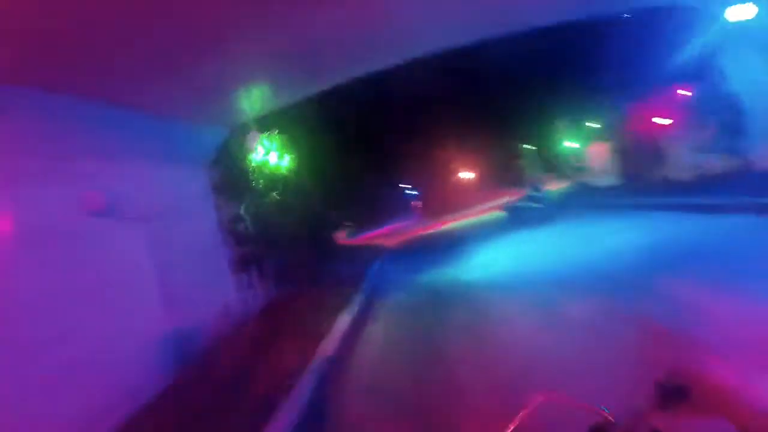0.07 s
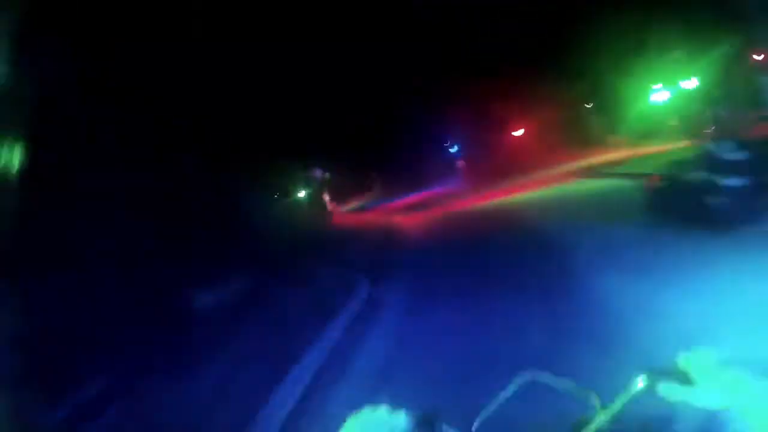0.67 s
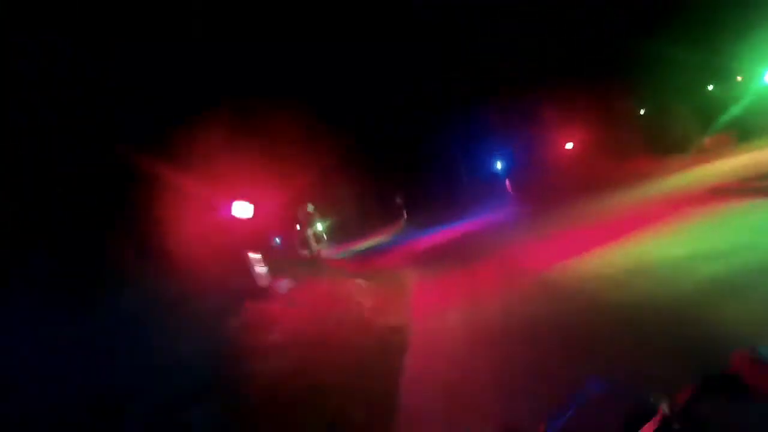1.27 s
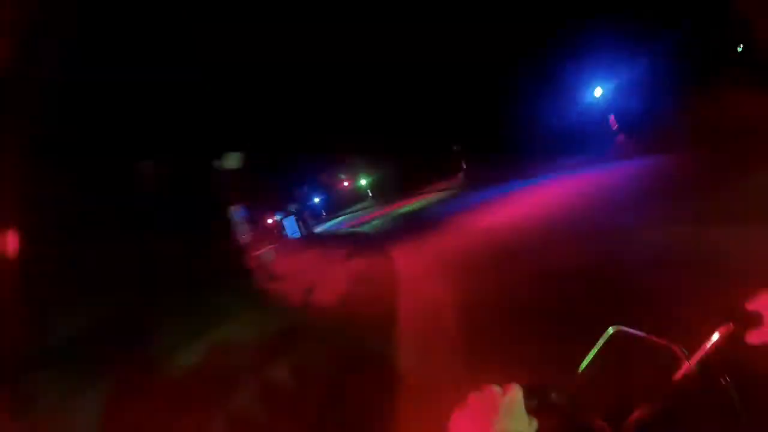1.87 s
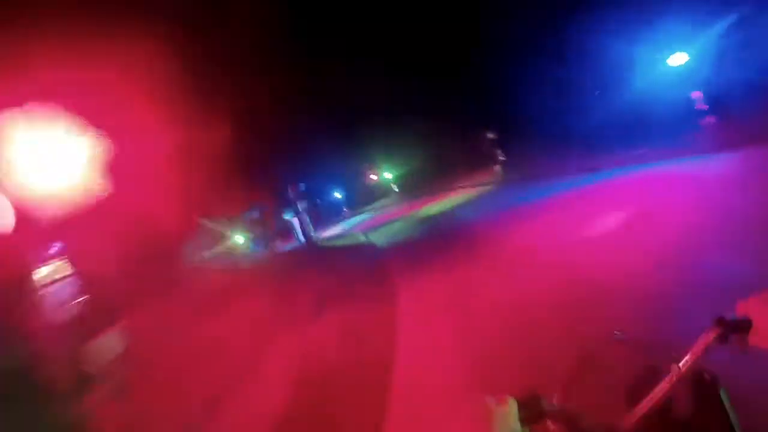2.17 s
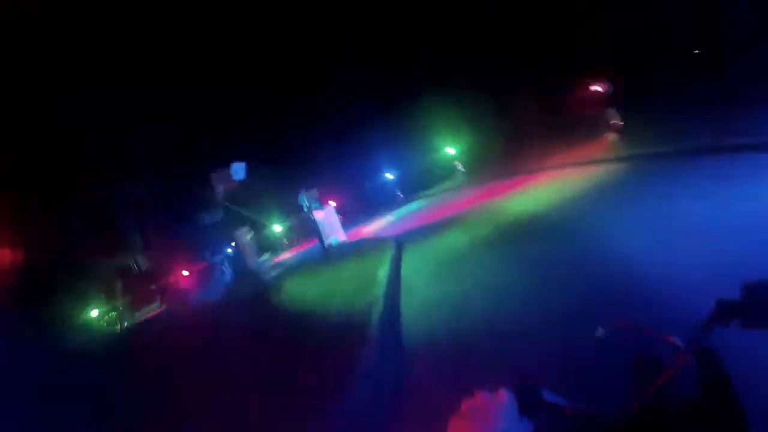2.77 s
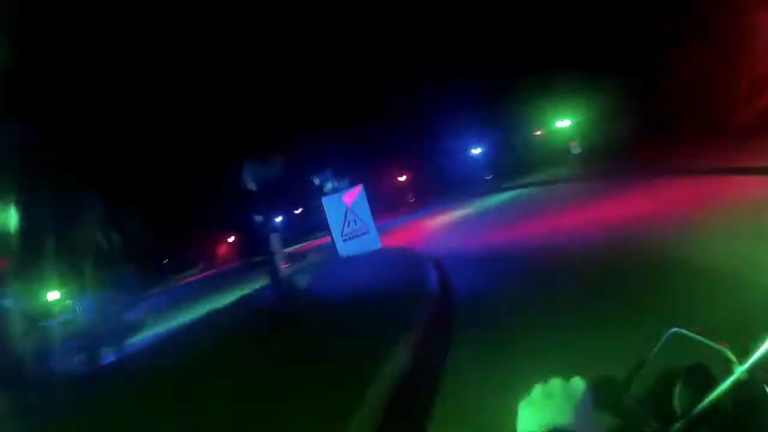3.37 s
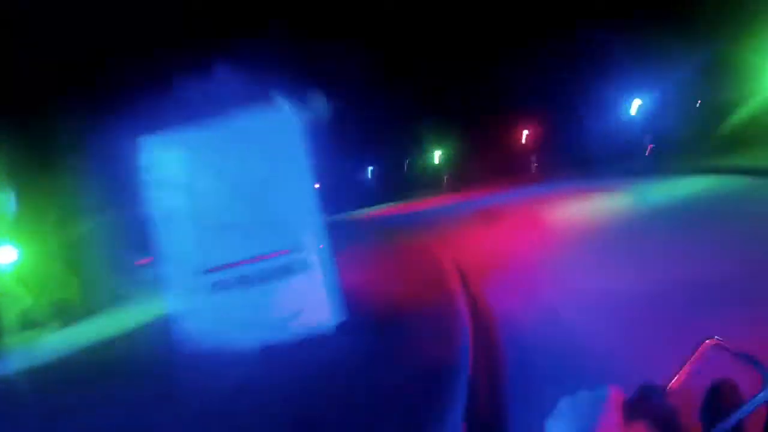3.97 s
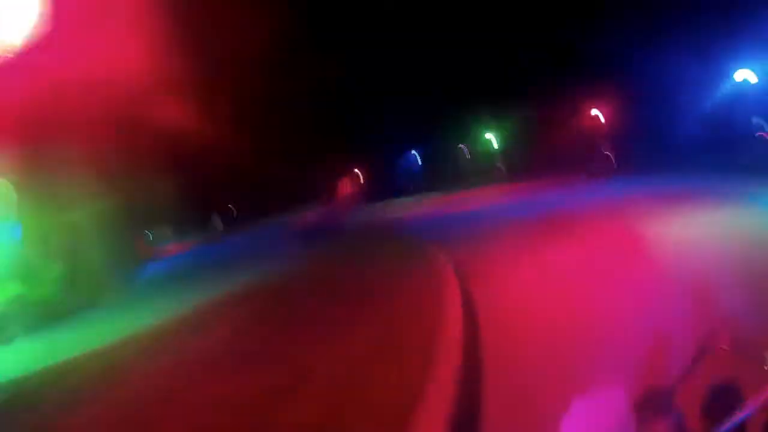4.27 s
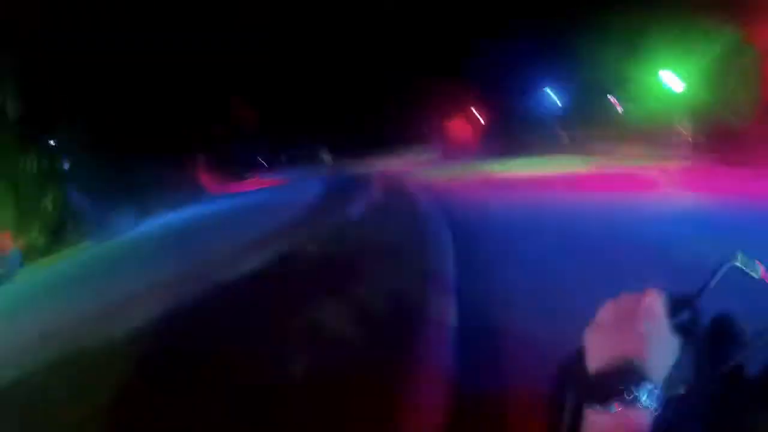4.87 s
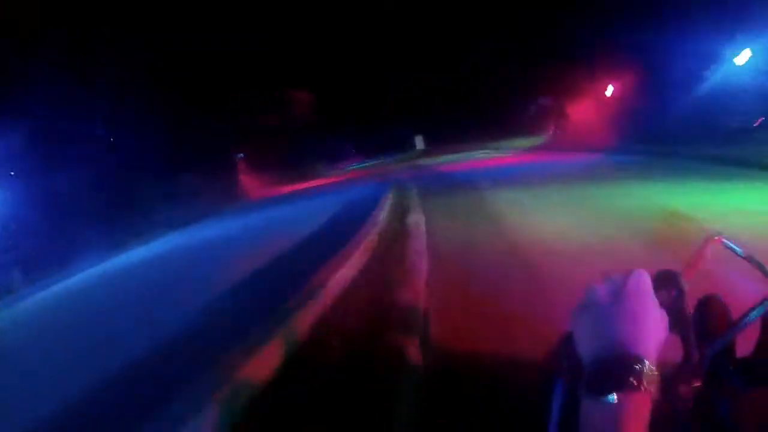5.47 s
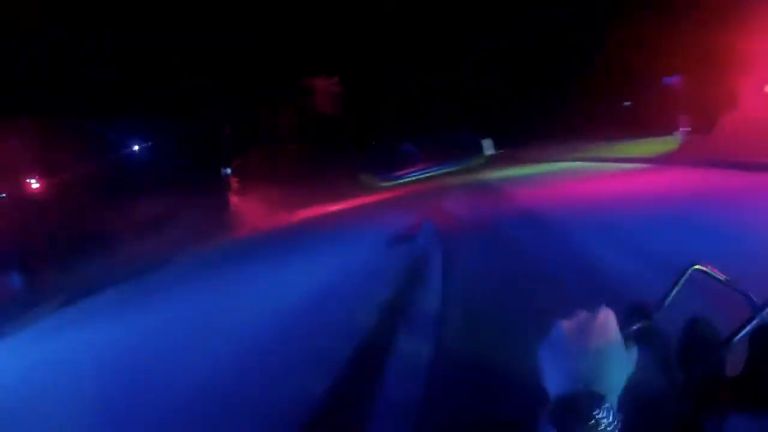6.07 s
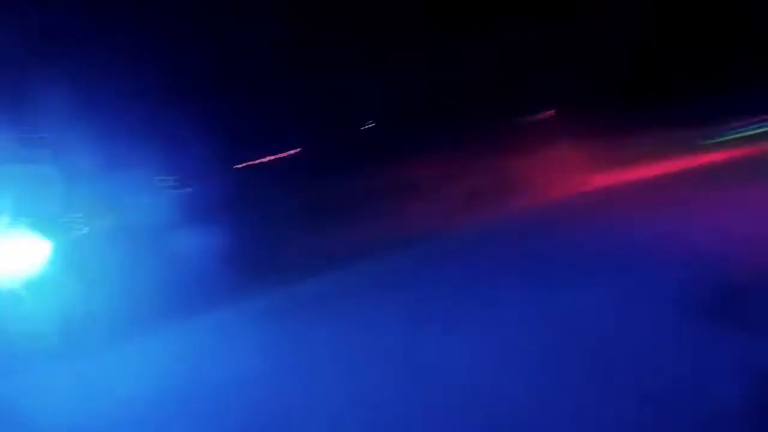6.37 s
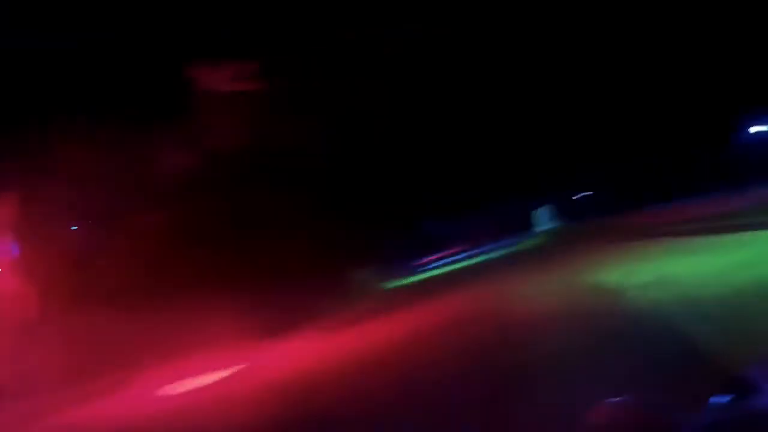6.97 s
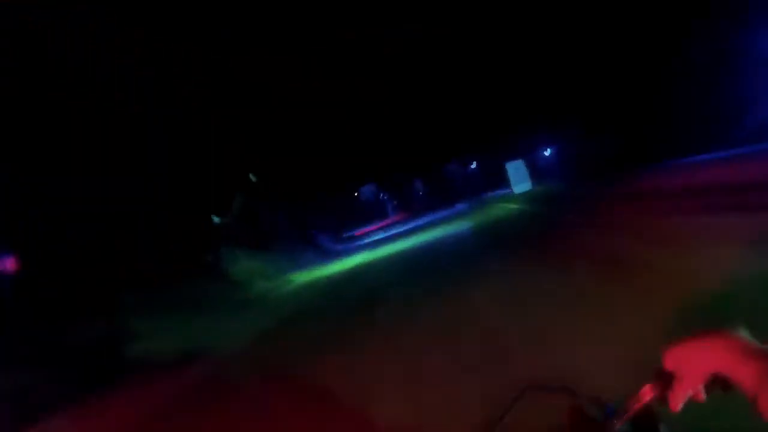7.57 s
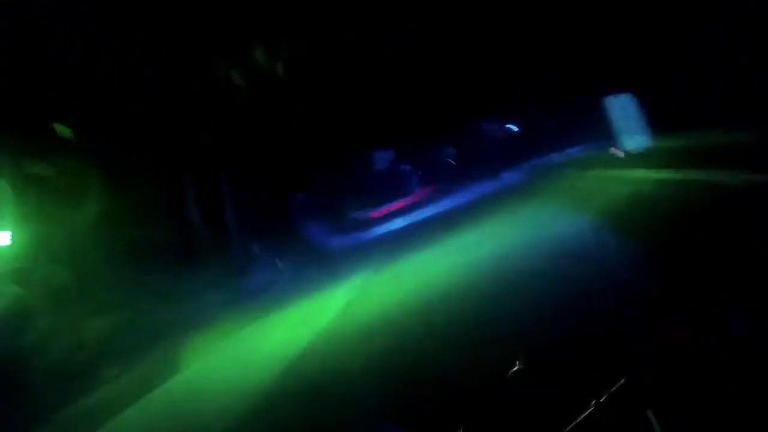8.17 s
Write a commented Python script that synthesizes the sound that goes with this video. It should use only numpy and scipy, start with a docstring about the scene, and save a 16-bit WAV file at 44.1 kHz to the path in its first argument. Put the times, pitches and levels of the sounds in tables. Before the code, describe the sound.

A small cart coasts down a paved track, heard from on board. Its hard wheels make a continuous gritty rumble and set the hollow body drumming, with deep wind and chassis sway underneath. A loose joint close to the microphone gives sharp, irregular plastic clacks. Midway a rough stretch makes the rolling, thuds and clacks louder, then the ride eases, with more bumps and clicks near the end.

```python
"""A small gravity cart rolls down a paved track, heard from on board.
Its hard wheels drum over the grain and bumps of the paving and set the shell ringing, loudest on a
rough stretch midway. A loose joint close by clacks as the cart shakes; chassis sway and wind rumble
below. A wheel squeaks, thin metal rubs and sings faintly, and electronics hiss and whine."""
import sys
import numpy as np
from scipy import signal
from scipy.fft import rfft, irfft, next_fast_len
from scipy.io import wavfile
from scipy.ndimage import uniform_filter1d

SR = 44100
rng = np.random.default_rng(int(sys.argv[2]) if len(sys.argv) > 2 else 0)


def pcm_store(signal):
    """Save signal as 16-bit PCM."""
    levels = np.round(np.clip(np.atleast_2d(signal), -1, 1) * 32767)
    wavfile.write(sys.argv[1], SR, levels.astype(np.int16).T)


N = 362061

# How hard the paving shakes the wheels: (time [s], level [dB])
ROLL = [(0.0, -51.5), (0.71, -53), (0.82, -50.5), (1.5, -48.5), (1.84, -54.5), (2.28, -47.5), (3.12, -46.5),
        (3.27, -50.5), (3.68, -52.5), (3.84, -39), (4.46, -39.5), (4.72, -37.5), (5.2, -38.5),
        (5.52, -45.5), (6.05, -51), (6.79, -43.5), (6.88, -51), (7.52, -47), (7.9, -44), (8.21, -47)]
# What the surface brings out, relative to that shaking: (time [s], shell drumming [dB], grit hiss [dB])
SURFACE = [(0.0, -2.5, -17.5), (1.1, -2, -15), (2.0, -2.5, -16.5), (4.2, -4, -16.5), (5.3, -1.5, -15.5),
           (8.21, 0.5, -14)]
def rolling(roll_db):
    """The grain of the paving drums on the shell, roars in the wheels and sprays a gritty hiss."""
    shell_db, grit_db = in_time(SURFACE)
    jolt = jolts(roll_db)
    hop_db = 2.0 * drift(47)  # the wheels hop, so all contact noise flutters together
    tread, rush = paving_grain()
    # the heavy shell follows hops and bumps less than the wheels do
    shell_force = from_db(0.75 * hop_db) * (from_db(roll_db) + 0.96 * jolt)
    wheel_force = from_db(roll_db + hop_db) + 1.84 * jolt
    drumming = from_db(shell_db) * shell_drumming(tread, rush)
    roar = from_db(-4.0) * wheel_roar(tread, rush) + from_db(grit_db) * grit_hiss()
    return drumming * shell_force + roar * wheel_force


# Bumps in the paving: (time [s], strength [dB], settling time [s])
BUMPS = [(0.816, -51.5, 0.037), (1.905, -44, 0.021), (2.243, -45.5, 0.022), (2.898, -40, 0.0058),
         (3.091, -32.5, .018), (3.369, -47.5, 0.041), (3.607, -45.5, 0.011), (3.835, -41, 0.016),
         (3.966, -39, 0.022), (4.664, -34, 0.013), (5.285, -31.5, 0.0099), (5.585, -50, 0.015),
         (5.824, -46.5, 0.018), (6.743, -44.5, .015), (6.81, -44.5, 0.012), (7.06, -40.5, 0.019),
         (7.645, -45, 0.028), (7.708, -43, 0.014), (7.797, -41, 0.011), (7.879, -37, 0.015),
         (7.951, -40, 0.008), (8.05, -46, 0.024)]
def jolts(roll_db, rise_s=0.0015, knock_s=0.0086):
    """Each bump, and each small random knock, presses the wheels hard and lets go as they settle."""
    knocks = [(s, roll_db[int(s * SR)] - 5.5 - 0.5 * luck, knock_s)
              for s, luck in chance_times(per_s=26)]
    age = np.arange(SR // 4) / SR
    force = np.zeros(N + SR)
    for s, db, settle_s in list(BUMPS) + knocks:
        at = round(s * SR)
        force[at:at + len(age)] += from_db(db) * (1 - np.exp(-age / rise_s)) * np.exp(-age / settle_s)
    return force[:N]


# The broad tone of the paving: (frequency [Hz], level [dB])
PAVING = [(60, -35), (120, 1), (220, 4), (500, -3), (1000, -10), (1650, -7), (2000, -18), (3000, -63)]
def paving_grain():
    """The wheels meet countless tiny stones: raw taps on the tread, and a duller rush."""
    tread = stones(per_s=8000, spread_db=2.5)
    rush = colour(stones(per_s=8000, spread_db=2.5), PAVING)
    return tread, rush


# The low notes the shell rings at: (pitch [Hz], width [Hz], level [dB])
SHELL = [(214.4, 39.4, 0), (302, 53, -2), (409, 56, -2.5), (559, 51, -6), (743, 53, -10)]
def shell_drumming(tread, rush):
    """The taps set the shell ringing over the low part of the rush."""
    ring = rms_one(cut(body(tread, SHELL), 860, "low", order=4))
    return rms_one(ring + from_db(-3.5) * cut(rush, 648, "low", order=4))


WHEEL_RING_HZ = 1412  # the wheels' strongest note
# The notes the wheels ring at: (pitch [Hz], width [Hz], level [dB])
WHEELS = [(906, 130, -11), (1030, 31, -7.5), (WHEEL_RING_HZ, 141, 0), (1740, 161, -14.5)]
def wheel_roar(tread, rush):
    """The taps set the hard wheels ringing within the high part of the rush."""
    ring = rms_one(cut(body(tread, WHEELS), 1513, "low", order=6))
    return rms_one(ring + from_db(5.0) * cut(rush, 668, "high", order=4))


# The high notes that grit sets ringing: (pitch [Hz], width [Hz], level [dB])
GRIT = [(2185, 110, 6), (3175, 210, 4.5), (3810, 220, 4), (4860, 270, -3.5), (5820, 510, -3.5)]
# The broad tone of its fine spray: (frequency [Hz], level [dB])
SPRAY = [(1500, -27), (2100, 0.5), (4000, -4.5), (6000, -16), (8500, -19.5), (10800, -18), (13500, -28),
         (15500, -45)]
def grit_hiss():
    """Sand under the wheels makes a ringing crackle and a fine, bright spray."""
    crackle = body(stones(per_s=4000, spread_db=4.5), GRIT)
    crackle = cut(crackle, 5200, "low", order=3)
    crackle = cut(crackle, 2300, "high", order=2)
    spray = colour(stones(per_s=9800, spread_db=1.0), SPRAY)
    return rms_one(rms_one(crackle) + from_db(2.5) * spray)


# The joint's clacks: (time [s], strength [dB], wait until its one bounce [s]; 0 = no bounce)
CLACKS = [(.5500, -15, 0.0063), (.5753, -29.5, 0.0017), (.764, -41, 0), (0.8514, -19.5, 0), (1.191, -20, 0),
          (1.2525, -19.5, 0.00069), (1.2786, -14, .0067), (1.3415, -26, 0), (1.6527, -28.5, 0),
          (3.0754, -15, 0), (3.0977, -12, 0), (4.3744, -28.5, 0), (4.7815, -4.5, 0.00087), (4.9714, -14, 0),
          (5.087, -3.5, .0047), (5.154, -10, 0), (5.2026, -16, .0268), (6.4240, -12, .0038),
          (6.5183, -34, 0), (6.58, -28.5, 0.0012), (6.5961, -21.5, 0.0031), (6.6780, -15, 0.00054),
          (6.7191, -9, 0.0076), (7.0857, -22, 0), (7.3810, -21, 0.0024), (7.6901, -15.5, 0.0008),
          (7.7515, -17, 0), (8.0003, -12.5, .0039), (8.0467, -24.5, 0.001), (8.1600, -15.5, 0)]
def loose_joint(roll_db, bounce_loss_db=11):
    """The shaking joint clacks, sometimes bounces, and ticks lightly at random moments."""
    clacks = [(s, db) for s, db, gap_s in CLACKS]
    bounces = [(s + gap_s, db - bounce_loss_db) for s, db, gap_s in CLACKS if gap_s > 0]
    ticks = [(s, roll_db[int(s * SR)] + 0.5 + 3.6 * luck) for s, luck in chance_times(per_s=2.6)]
    usual_db = np.median([db for s, db in clacks])
    out = np.zeros(N + SR)
    for s, db in clacks + bounces + ticks:
        sound = clack(force_db=db - usual_db)
        at = round(s * SR)
        out[at:at + len(sound)] += from_db(db + 9.5) * sound
    return cut(out[:N], 12000, "low", order=3)


# The joint's notes: (pitch [Hz], width [Hz], level [dB], extra level [dB per dB of force])
JOINT = [(1696, 200, 4, 0), (3140, 540, 1.5, 0), (4180, 540, -0.5, 0), (4790, 410, 1, -0.05),
         (6440, 1120, -1, 0.17), (9860, 730, -9, 0), (10580, 900, -6.5, 0), (12030, 510, -18, 0.5)]
def clack(force_db, rebound_s=0.00046, ring_s=0.0015):
    """The joint snaps shut and the plastic rings briefly, brighter for a harder blow; energy 1."""
    age = np.arange(SR // 30) / SR
    push = from_db(-22) * rng.standard_normal(len(age)) * np.exp(-age / ring_s)
    push[0] += 1  # the snap
    push[int(rebound_s * rng.uniform(.95, 1.05) * SR)] += 0.27  # its quick rebound
    detunes = 1 + .015 * rng.standard_normal(len(JOINT))  # no two clacks ring quite alike
    notes = [(hz * detune, width, db + extra * force_db + 0.92 * rng.normal())
             for (hz, width, db, extra), detune in zip(JOINT, detunes)]
    sound = cut(body(push, notes), 1005, "high", order=3)
    return sound / np.linalg.norm(sound)


# How strongly sway and wind rumble: (time [s], level [dB])
SWAY = [(0.0, -49), (1.6, -39.5), (1.94, -44.5), (2.18, -36.5), (3.1, -34), (3.74, -43.5), (3.88, -32),
        (4.11, -42), (4.51, -34), (7.09, -35), (7.21, -41.5), (8.21, -36)]
# Short, deep thuds as bumps jolt the chassis or wind buffets the cart: (time [s], level [dB])
THUDS = [(1.71, -37.5), (3.11, -33), (4.62, -29.5), (5.15, -23), (5.32, -27), (5.53, -33.5), (6.75, -33),
         (7.06, -30), (8.07, -34)]
# The deep tone of the rumble: (frequency [Hz], level [dB])
RUMBLE = [(8, -28), (16, -23), (30, 1.5), (48, 1), (62, -7), (80, -19.5), (110, -17), (200, -65)]
def sway_and_wind(thud_half_s=0.034):
    """The swaying chassis and the wind make a deep rumble, with random lumps and short thuds."""
    sway_db, = in_time(SWAY)
    t = np.arange(N) / SR
    thuds = sum(from_db(db) * np.exp(-((t - s) / thud_half_s) ** 2) for s, db in THUDS)
    lumps_db = 2.0 * drift(8.1)
    strength = np.hypot(from_db(sway_db - 1.0 + lumps_db), thuds)
    noise = colour(rng.standard_normal(N), RUMBLE)
    own_level = np.sqrt(uniform_filter1d(noise ** 2, size=SR // 9) + 1e-6)
    even_noise = noise / own_level
    return cut(strength * even_noise, 74, "low", order=5)


# The low tone of the running gear: (frequency [Hz], level [dB])
DRONE = [(60, 2.5), (110, -1.5), (150, -4), (400, -9), (700, -36.5), (1500, -53)]
def gear_drone():
    """The running gear gives a steady, low drone."""
    return from_db(-51) * colour(rng.standard_normal(N), DRONE)


# The wheel bearing's squeaks: (time [s], pitch [Hz], level [dB])
SQUEAKS = [(2.838, 7160, -65), (2.870, 7060, -59), (5.824, 5050, -62), (6.195, 5100, -65),
           (6.229, 5060, -60), (6.462, 5100, -59)]
def bearing_squeaks(length_s=0.018, pitch_fall=0.14):
    """A wheel bearing gives tiny chirps, each sinking in pitch."""
    out = np.zeros(N + SR)
    along = np.linspace(-.5, .5, int(length_s * SR))
    for s, hz, db in SQUEAKS:
        at = round(s * SR)
        phase = 2 * np.pi * np.cumsum(hz * (1 - pitch_fall * along)) / SR
        out[at:at + len(along)] += from_db(db) * np.cos(np.pi * along) ** 2 * np.sin(phase)
    return out[:N]


# How hard the thin metal rubs: (time [s], level [dB])
RUBBING = [(2.0, -84), (3.6, -88), (4.8, -71), (5.7, -79), (7.3, -86), (7.85, -74), (8.2, -83)]
# The notes it sings: (pitch [Hz], width [Hz], level [dB])
METAL = [(7520, 55.5, 4), (11100, 70, -1), (13800, 99, -6)]
def singing_metal():
    """Light, uneven rubbing sets thin metal singing in short spurts."""
    rub_db, = in_time(RUBBING)
    contact_db = 6.0 * np.tanh(drift(12))  # the parts touch and let go
    return from_db(rub_db + contact_db) * rms_one(body(rng.standard_normal(N), METAL))


# The tone of the electronic hiss: (frequency [Hz], level [dB])
HISS = [(4000, 0), (8500, 2.5), (13000, 1), (14300, -5), (15300, -18)]
def electronics(roll_db, whine_hz=9526, switch_hz=36.6):
    """A steady hiss, and a thin whine that swells a little on rough ground."""
    cycle = 2 * np.pi * np.arange(N) / SR
    phase_step = 0.82 * np.sign(np.sin(switch_hz * cycle))  # the wave jumps back and forth
    whine = np.sin(whine_hz * cycle + phase_step)
    swell_db = 0.64 * (uniform_filter1d(roll_db, size=SR // 2) - roll_db.mean())
    hiss = colour(rng.standard_normal(N), HISS)
    return from_db(-71.5) * hiss + from_db(-69.5 + swell_db) * whine


def stones(per_s, spread_db):
    """Tiny impacts at random moments, a few larger than the rest."""
    sizes = from_db(spread_db * np.minimum(rng.exponential(1, N), 4)) * rng.choice([-1, 1], N)
    return rms_one(sizes * (rng.random(N) < per_s / SR))


def chance_times(per_s, count=400):
    """Random moments: rows of (time [s], luck), where luck is a random number around 0."""
    s = np.cumsum(rng.exponential(1, count)) / per_s
    return np.column_stack([s, rng.standard_normal(count)])[s < (N - 1) / SR]


def drift(rate_hz):
    """A smooth random wobble with a typical size of 1."""
    r = np.exp(-80 * np.pi * rate_hz / SR)
    slow = signal.lfilter([1], [1, -2 * r, r * r], rng.standard_normal(N // 40 + 2002))[2000:]
    return np.interp(np.arange(N) / 40, np.arange(len(slow)), rms_one(slow))


def resonate(x, hz, width_hz):
    """Ring at one note; the narrower its width, the longer it rings."""
    r = np.exp(-np.pi * width_hz / SR)
    feedback = [1, -2 * r * np.cos(2 * np.pi * hz / SR), r * r]
    return signal.lfilter(np.array([1, 0, -1]) * (1 - r * r) / 2, feedback, x)


def body(x, notes):
    """Ring at several notes at once, with every second wave flipped over."""
    return sum((-1) ** k * from_db(db) * resonate(x, hz, width)
               for k, (hz, width, db) in enumerate(notes))


def colour(x, spectrum):
    """Give a steady sound a broad tone, at an average level of 1."""
    hz, db = np.transpose(spectrum)
    size = next_fast_len(N)
    bins_hz = np.maximum(np.arange(size // 2 + 1) * SR / size, 1)
    gain = from_db(np.interp(np.log(bins_hz), np.log(hz), db))
    return rms_one(irfft(rfft(x, size) * gain, size)[:N])


def cut(x, hz, keep, order):
    """Keep the "low" or the "high" side of a frequency."""
    return signal.sosfilt(signal.butter(order, hz, keep, fs=SR, output="sos"), x)


def in_time(rows):
    """Join a table's points into one curve for each column after the time."""
    s, *columns = np.transpose(rows)
    return [np.interp(np.arange(N) / SR, s, column) for column in columns]


def from_db(db):
    """Turn decibels into a multiplier."""
    return 10 ** (np.asarray(db) / 20)


def rms_one(x):
    """Scale to an average (rms) level of 1."""
    return x / np.sqrt(np.mean(x ** 2) + 1e-20)


def scene():
    """The rolling cart and all its smaller noises, in one channel."""
    roll_db, = in_time(ROLL)
    roll_db = roll_db + drift(8.7)  # the paving changes from metre to metre
    cart = rolling(roll_db) + sway_and_wind() + gear_drone() + bearing_squeaks() + singing_metal()
    return (cart + electronics(roll_db) + loose_joint(roll_db))[None, :]


def record(dry):
    """The highest treble, above 15100 Hz, is cut steeply."""
    return signal.sosfilt(signal.ellip(8, .2, 80, 15100, fs=SR, output="sos"), dry)


dry = scene()
out = record(dry)
pcm_store(out)
```